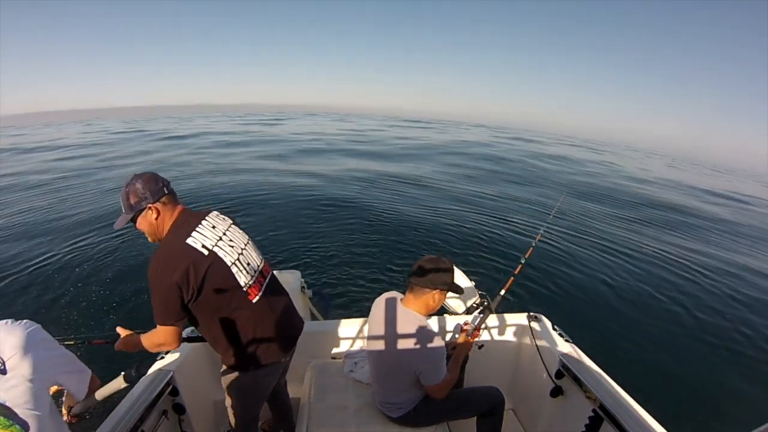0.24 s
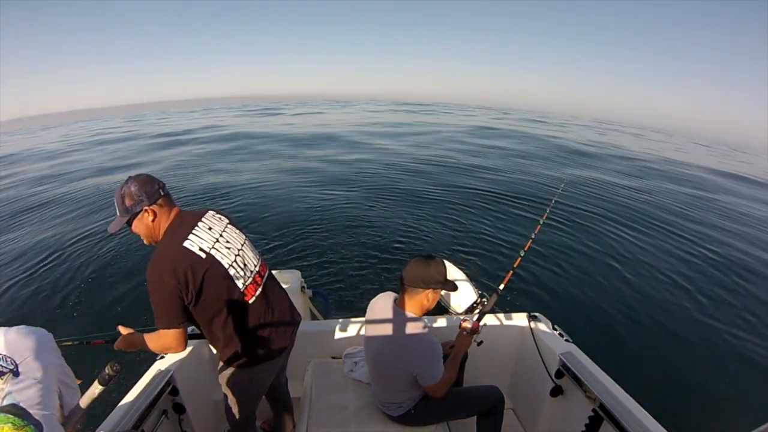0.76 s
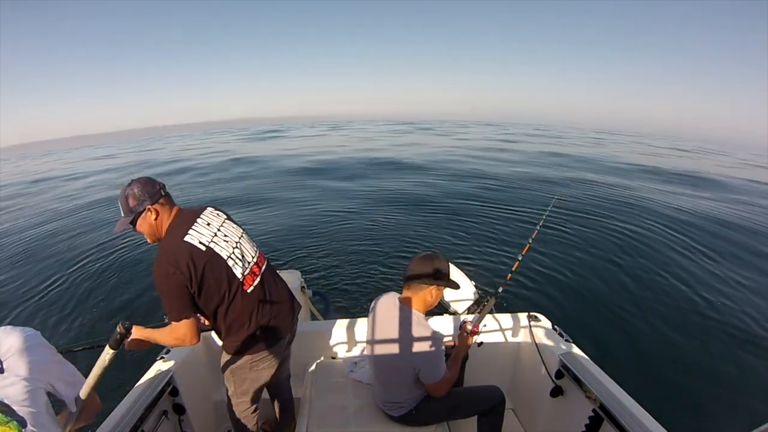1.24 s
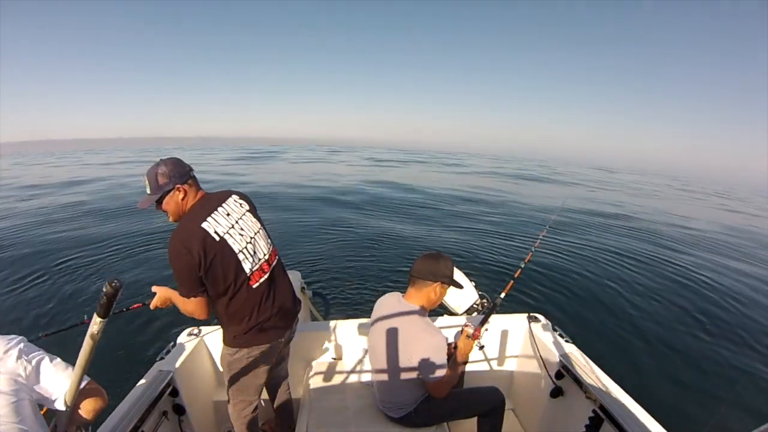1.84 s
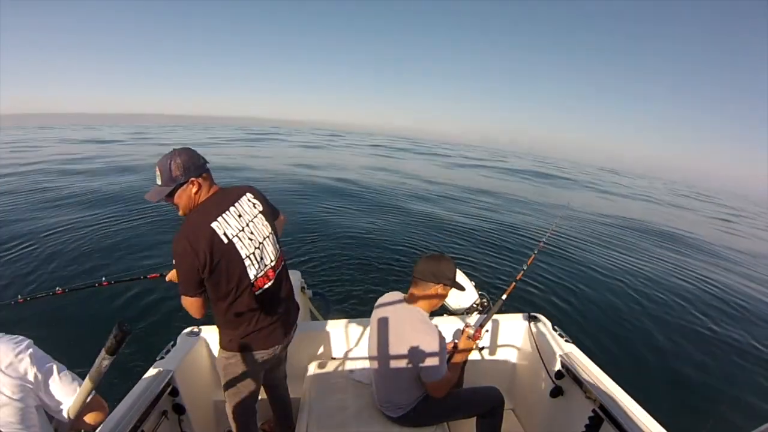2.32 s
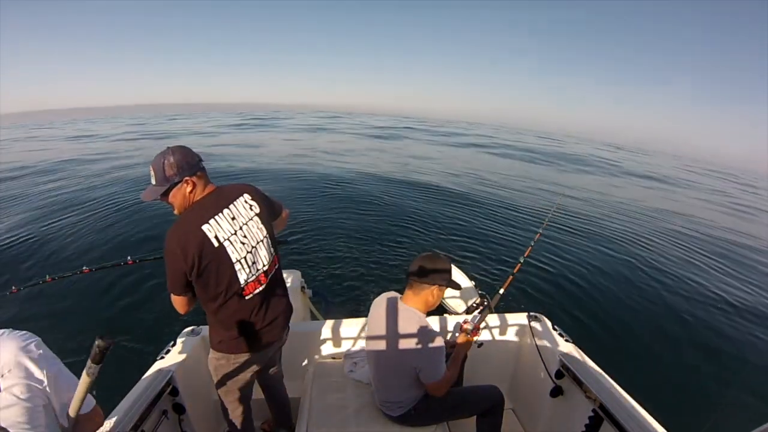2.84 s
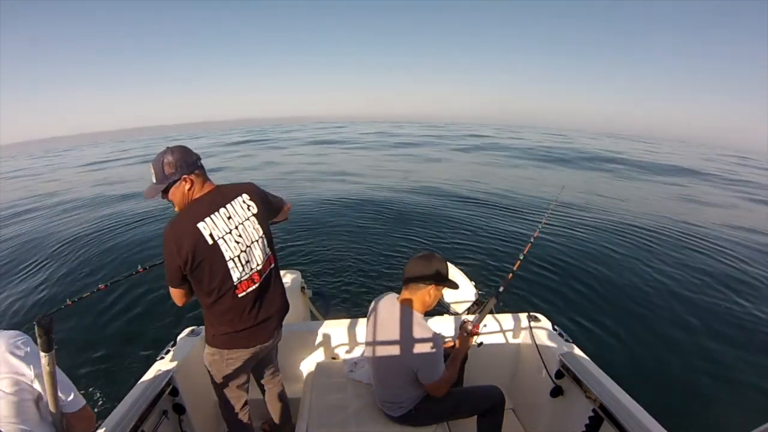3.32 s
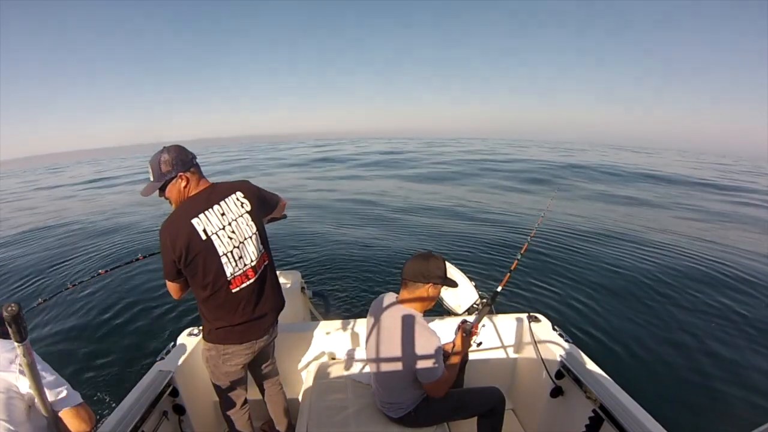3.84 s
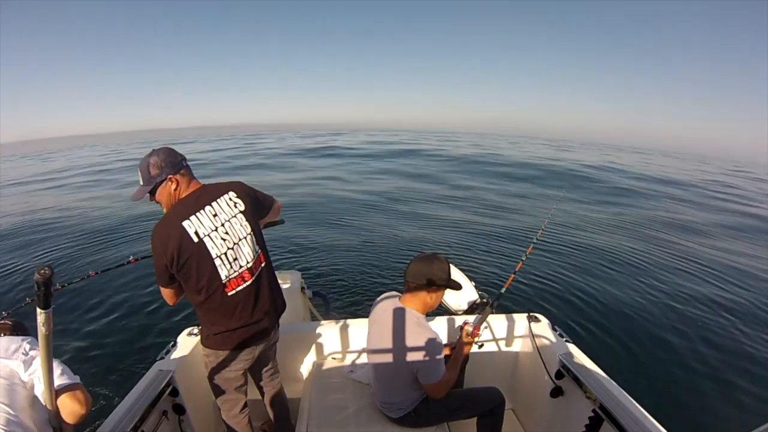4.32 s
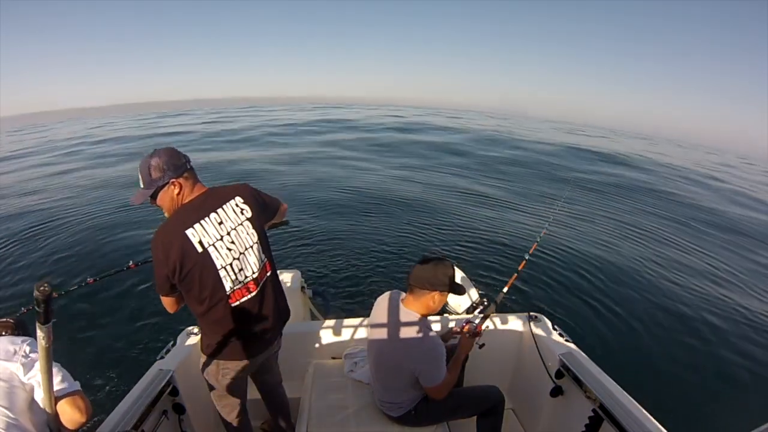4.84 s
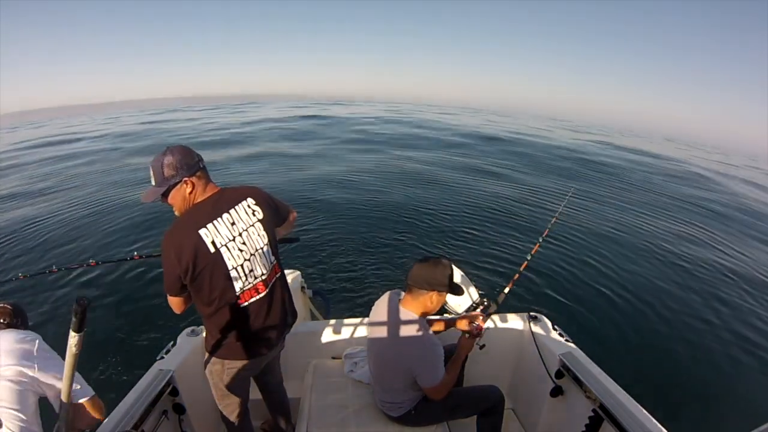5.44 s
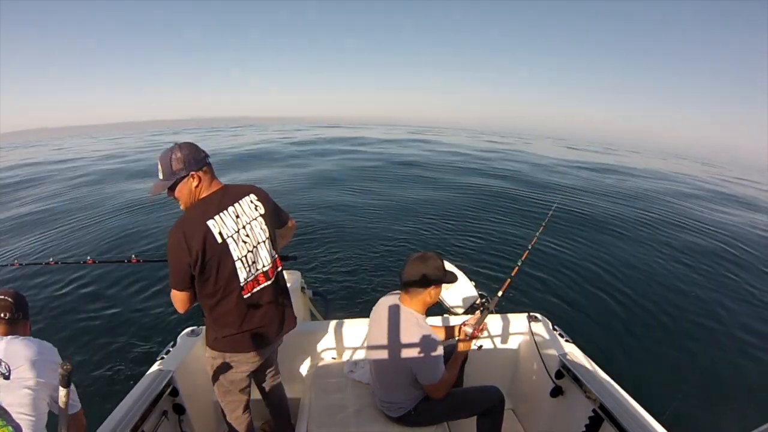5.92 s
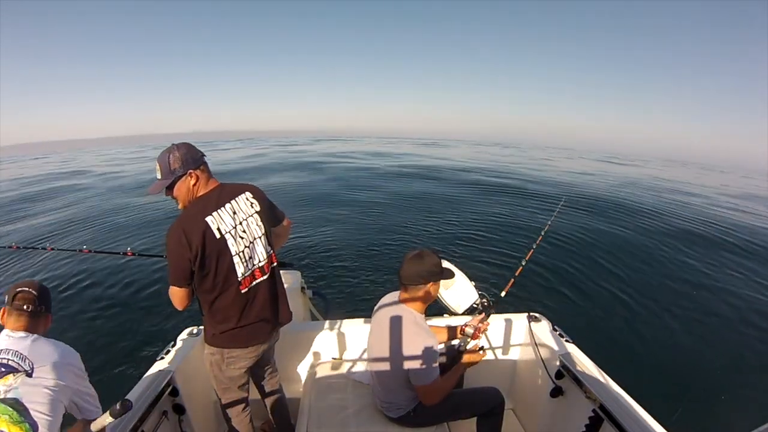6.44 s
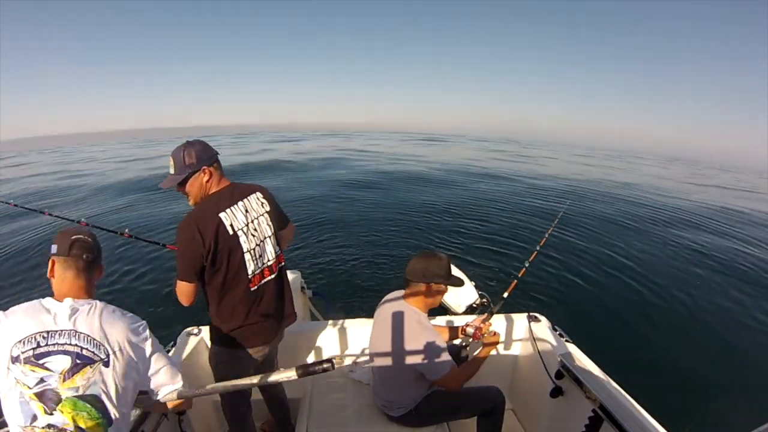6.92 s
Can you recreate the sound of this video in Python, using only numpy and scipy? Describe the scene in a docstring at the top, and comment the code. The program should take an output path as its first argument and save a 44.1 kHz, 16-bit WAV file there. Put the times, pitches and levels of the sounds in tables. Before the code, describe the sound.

Low throbbing boat engine idle on calm water, with early hull slaps and a brief line rasp, buzzing panel rattles, sharp clicks and a final knock.

```python
"""In the cockpit of a small fishing boat on a calm sea, an outboard idles a few metres away, its speed hunting.
At once wavelets slap and gulp at the hull, gear rustles and tackle clicks; at half a second line rasps off a reel.
A loose panel rattles in bouts, fullest near 2.8 and 5.1 s; a deep gulp comes at 3.5 s, a low burble swell at 3.8 s.
More clicks follow from 5.5 s and a rod butt knocks on the hull at 7.1 s; the cooling jet hisses throughout.
Firing pulses and sines make the engine, filtered noise the hiss and rubbing, damped modes the struck parts."""
import sys
import numpy as np
from scipy import signal
from scipy.fft import rfft, irfft
from scipy.io import wavfile
from scipy.ndimage import uniform_filter1d

SR = 44100
rng = np.random.default_rng(int(sys.argv[2]) if len(sys.argv) > 2 else 0)


def master_out(mix):
    """Clip the mix to full scale and print it as 16-bit PCM to the path in sys.argv[1]."""
    frames = np.transpose(np.atleast_2d(mix))
    ceiling = np.clip(frames, -1, 1)
    pcm = np.round(ceiling * 32767).astype(np.int16)
    wavfile.write(sys.argv[1], SR, pcm)


N = 316197
TIME = np.arange(N) / SR


def undb(db):
    """Decibels to gain."""
    return 10 ** (np.asarray(db) / 20)


def unit(x):
    """Scale to rms 1."""
    return x / np.sqrt(np.mean(x ** 2))


def crest(x):
    """Scale to peak 1."""
    return x / np.max(np.abs(x))


def curve(rows):
    """Each column of a table as a line through time."""
    s, *columns = np.transpose(rows)
    return [np.interp(TIME, s, column) for column in columns]


def walk(rate):
    """Smooth chance with spread 1, changing about rate times a second."""
    k = max(int(SR / rate), 1)
    steps = rng.standard_normal(size=1024).take(np.arange(N) // k, mode="wrap")
    return unit(uniform_filter1d(uniform_filter1d(steps, k), k))


def colour(x, points, size=8192):
    """Causal minimum-phase filter whose spectrum follows (Hz, dB) points."""
    hz, db = np.transpose(points)
    bin_hz = np.arange(size // 2 + 1) * SR / size
    gain = undb(np.interp(np.log(bin_hz + 1), np.log(hz), db))
    # folding the cepstrum forward in time makes the filter causal
    cepstrum = irfft(np.log(gain))
    cepstrum[1:size // 2] *= 2
    cepstrum[size // 2 + 1:] = 0
    impulse = irfft(np.exp(rfft(cepstrum)))
    return signal.fftconvolve(x, impulse)[:len(x)]


def fade(t60, size=12000):
    """A free decay that falls 60 dB in t60 seconds."""
    return np.exp(-np.log(1000) * TIME[:size] / t60)


def ring(modes, size=12000):
    """Damped modes start from rest after one blow; neighbours swing in opposite directions."""
    out = 0
    for k, (hz, db, t60) in enumerate(modes):
        swing = np.sin(2 * np.pi * hz * TIME[:size])
        out = out + (-1) ** k * undb(db) * fade(t60) * swing
    return out


def burst(t60, tail_t60, tail_db, size=12000):
    """A crack of noise and its weaker, longer scatter around the cockpit."""
    return rng.standard_normal(size) * (fade(t60) + undb(tail_db) * fade(tail_t60))


def add(out, s, x):
    """Mix x in at s seconds."""
    i = int(s * SR)
    out[i:i + len(x)] += x[:max(N - i, 0)]


def firings(turns, scatter_db, jitter_s):
    """One pulse per firing, each with its own size and delay."""
    at = np.flatnonzero(np.diff(np.floor(turns)))
    chance = rng.standard_normal((512, 2))[:len(at)]
    delay = (jitter_s * SR * chance[:, 1]).astype(int)
    pulses = np.zeros(N)
    pulses[np.clip(at + delay, 0, N - 1)] = undb(scatter_db * chance[:, 0])
    return pulses


def cycle_noise(turns, size=1920):
    """Noise that comes round again every two firings, as the same parts meet in the same order."""
    return np.interp(turns / 2 * size, np.arange(size), rng.standard_normal(size), period=size)


# exhaust drone, before the first overtone row's own level: time_s, level_db
DRONE_LEVEL = [(0.0, -31), (0.1, -36), (0.17, -30), (.26, -28.5), (0.31, -24.5), (.45, -25), (0.8, -21.5),
               (1.1, -23), (1.6, -26), (1.69, -40), (1.78, -22.5), (1.87, -35), (1.945, -29), (2.1, -24),
               (2.17, -30.5), (2.25, -24.5), (2.34, -30), (2.42, -24.5), (2.68, -24), (2.9, -30),
               (2.98, -20), (3.12, -27), (3.3, -24), (3.65, -22.5), (3.92, -26), (4.15, -32), (4.22, -31.5),
               (4.32, -29), (4.42, -25.5), (4.9, -29), (5.12, -33), (5.32, -24), (5.62, -23), (6.3, -25.5),
               (6.44, -26), (6.52, -34.5), (6.58, -25.5), (6.66, -35), (6.76, -26), (6.94, -26.5),
               (7.01, -21), (7.17, -24)]
# the drone and its overtones: multiple of the firing rate, level_db, roughness (0-1)
OVERTONES = [(1, -0.5, 0.05), (1.5, -22.5, 0.85), (2, -18.5, 0.05), (3.5, -24, 0.36), (4, -29, 0.06),
             (5.5, -29.5, 0.64), (10.5, -33, 0.32), (14.5, -35.5, 0.72), (16.5, -29.5, 0.45),
             (18.4, -30.5, 0.56)]
# resonances of the exhaust housing, which lift overtones that come near: pitch_hz, width_hz, lift_db
HOUSING = [(88.9, 7.9, 6), (177.9, 7.9, 7)]
# swell and sinking of the hum from overtones 3.5 and 4: time_s, lift_db
HUM_LIFT = [(0, -4.5), (.9, 1.5), (1.7, 3), (2.3, -1.5), (2.85, 3.5), (3.6, 2), (4.4, -5.5), (5.1, 0.5),
            (5.8, 4), (6.3, -1.5), (7.17, -2.5)]
THROB_DB, THROB_HZ = -43, 6.7  # uneven combustion: size, counted like the drone level, and mean rate
OVERTONE_DB = -27.5  # the level that the overtones above the first are counted from
ROUGH_HZ = 35.97  # how fast a rough overtone flutters


def drone(turns, firing_hz):
    """The muffled exhaust: nearly a sine at the firing rate, with overtones that resonate or break up roughly."""
    level_db, = curve(DRONE_LEVEL)
    throb = np.sin(2 * np.pi * np.cumsum(THROB_HZ * (1 + 0.15 * walk(rate=7))) / SR)
    fundamental = undb(level_db) + undb(THROB_DB) * throb
    hum_db, = curve(HUM_LIFT)
    out = 0
    for k, db, rough in OVERTONES:
        sway = 0.05 * (k > 1) * walk(rate=8)  # phase drift in turns
        scatter = walk(rate=ROUGH_HZ) + 1j * walk(rate=ROUGH_HZ)
        flutter = np.sqrt(1 - rough) + np.sqrt(rough / 2) * scatter
        lift_db = 0
        for hz, width, peak_db in HOUSING:
            lift_db = lift_db + peak_db / (1 + (2 * (k * firing_hz - hz) / width) ** 2)
        overtone = undb(OVERTONE_DB + lift_db + hum_db * (3 < k < 5) + walk(rate=6.5))
        size = fundamental if k == 1 else overtone
        wave = np.imag(flutter * np.exp(2j * np.pi * (k * turns + sway)))
        out = out + undb(db) * size * np.sqrt(2) * wave
    return out


# how hard the exhaust churns the water: time_s, level_db
CHURN_LEVEL = [(0, -37.5), (.4, -37.5), (.8, -35), (1.3, -35.5), (2.4, -38.5), (2.8, -34.5), (3.4, -38),
               (3.85, -35.5), (4.5, -40), (5.2, -34.5), (5.5, -37.5), (6.1, -36.5), (7.17, -36)]
# colour of the churned water: pitch_hz, level_db
BURBLE_COLOUR = [(8, -28), (18, -6.5), (30, -2), (42, -2.5), (55, -2), (64, 4.5), (72, 1), (82, 0),
                 (102, 0), (125, -6.5), (160, -9.5), (178, -6), (198, -15), (255, -12), (330, -16.5),
                 (400, -23.5), (600, -58.5)]


def burble(turns):
    """Uneven puffs of exhaust churn the water behind the transom."""
    level_db, = curve(CHURN_LEVEL)
    puffs = unit(firings(turns, scatter_db=4, jitter_s=0.0021))
    gas = colour(undb(-10.5) * puffs + rng.standard_normal(N), BURBLE_COLOUR)
    return unit(gas) * undb(level_db)


# colour of the noise under the cowling: pitch_hz, level_db
MACHINERY_COLOUR = [(200, -14), (330, -6), (480, 2), (630, -0.5), (785, -1.5), (825, 4), (880, -3.5),
                    (920, -3.5), (1030, -2.5), (1230, -11.5), (1500, -15.5), (1900, -23), (2400, -25.5),
                    (3000, -36.5), (5000, -51.5)]
MACHINERY_DB = -47.5  # mean level of the idle
CLATTER_DB = -11.5  # noise that repeats with every engine cycle, against the steady noise
NOTCH_SHARE = 0.7  # how much of one narrow band a reflection cancels


def machinery(turns):
    """Valve gear and intake under the cowling pulse with each firing; a reflection thins one narrow band."""
    pulse = 1 + 0.037 * np.cos(2 * np.pi * turns)
    clatter_gain = undb(CLATTER_DB + 2 * walk(rate=4.22))
    clatter = clatter_gain * cycle_noise(turns + 0.011 * walk(rate=6))
    wash = colour(pulse * (rng.standard_normal(N) + clatter), MACHINERY_COLOUR)
    notched = signal.lfilter(*signal.iirnotch(548, 9, SR), wash)
    wash = wash + NOTCH_SHARE * (notched - wash)
    return unit(wash) * undb(MACHINERY_DB + 0.5 * walk(rate=14))


# bouts of rattling: loudest_s, swell_s, dying_s, level_db (of the ring, without the dry crack)
RATTLE_BOUTS = [(.12, 0.13, 0.11, -52.5), (2.8, 0.21, 0.24, -47.5), (3.87, 0.21, 0.067, -52),
                (5.12, 0.21, 0.45, -47.5), (6.7, 0.17, 0.39, -63)]
# the panel's hardest strikes: start_s, peak_db (of the ring)
PANEL_STRIKES = [(2.586, -33.5), (2.696, -32.5), (2.74, -31), (2.763, -31.5), (2.832, -28.5), (2.854, -32),
                 (2.876, -29), (3.875, -43), (4.038, -39), (4.908, -39), (4.952, -35), (5.021, -33.5),
                 (5.088, -33), (5.156, -33), (5.203, -31.5), (5.224, -34.5), (5.27, -31.5), (5.292, -33.5),
                 (5.313, -33), (5.423, -42), (6.307, -37)]
# modes of the loose panel: pitch_hz, level_db, t60_s
PANEL_MODES = [(699, 3, 0.012), (885, 2, 0.0077), (1023, 1.5, 0.012), (2287, -12.5, 0.011)]
# colour of the panel's dry crack: pitch_hz, level_db
PANEL_CRACK_COLOUR = [(300, -15), (700, -9), (1050, -3), (1500, -10.5), (2350, -8.5), (3000, -14.5),
                      (4100, -13), (5300, -25), (9000, -31), (15000, -52)]
TAP_REST_DB = -66.5  # between bouts the panel barely ticks
CHATTER_S, CHATTER_DB = 0.007, 1  # each tap breaks into chatter: decay time, level against the clean tap
CRACK_DB, STRIKE_CRACK_DB = -13.5, -17  # dry crack against the ring, in light taps and hard strikes


def rattle(turns):
    """A loose panel taps once per firing in bouts; now and then a hard strike takes a tap's place."""
    force = undb(TAP_REST_DB)
    for s, swell_s, dying_s, db in RATTLE_BOUTS:
        width_s = np.where(TIME < s, swell_s, dying_s)
        force = force + undb(db) * np.exp(-((TIME - s) / width_s) ** 2)
    modes = ring(PANEL_MODES)
    age = TIME[:len(modes)]
    tap = crest(modes * age)  # a soft contact lets the ring swell in
    # keep the light taps in step with the hard ones, and leave out those that a hard one replaces
    strike_s = np.transpose(PANEL_STRIKES)[0]
    lag = np.unwrap(np.interp(strike_s, TIME, turns) % 1, period=1)
    beat = turns - np.interp(TIME, strike_s, lag)
    light = ~np.isin(np.round(beat), np.round(np.interp(strike_s, TIME, beat)))
    taps = light * firings(beat, scatter_db=2, jitter_s=0.0005)
    chatter = signal.fftconvolve(taps, np.exp(-age / CHATTER_S))[:N] * rng.standard_normal(N)
    contact = unit(taps) + undb(CHATTER_DB) * unit(chatter)
    ringing = unit(signal.fftconvolve(contact, tap)[:N])
    cracking = unit(colour(chatter, PANEL_CRACK_COLOUR))
    out = force * (ringing + undb(CRACK_DB) * cracking)
    for s, db in PANEL_STRIKES:
        noise = burst(t60=0.016, tail_t60=0.089, tail_db=-26)
        crack = crest(colour(noise, PANEL_CRACK_COLOUR))
        add(out, s, undb(db) * (tap + undb(STRIKE_CRACK_DB) * crack))
    return out


# clicks of the tackle, and at 2.885 s a bright tick of the rattling panel:
# start_s, peak_db, pitch_hz of the struck part, part_db of that note against the dry snap
CLICKS = [(0.163, -38, 8400, -19), (0.1709, -24.5, 2400, -16), (0.1748, -35, 6940, -7),
          (0.333, -46, 7150, -20), (0.429, -39.5, 7150, -15), (0.715, -47, 4060, 2),
          (.9952, -44, 8400, -10), (2.885, -49, 4120, 4), (5.529, -30.5, 7880, -8), (5.534, -29, 2400, -9),
          (5.5509, -19, 8500, -12), (5.5536, -23, 6090, 6), (5.5576, -24.5, 2400, -9),
          (5.739, -44.5, 6000, -2), (6.695, -32.5, 3130, 0), (6.6966, -28, 8400, -6),
          (6.701, -36.5, 2500, 4), (6.706, -37, 3180, -5), (6.8931, -45, 8400, -15),
          (6.961, -45, 8390, -15), (7.032, -47, 8390, -14)]
# colour of a click's dry snap: pitch_hz, level_db
SNAP_COLOUR = [(500, -3), (1700, -4.5), (2450, -4), (3300, -3), (4200, 0), (5400, -6), (6200, -4),
               (7200, 0), (8400, -0.5), (9300, -1.5), (10200, -9), (11700, -9), (13000, -9), (15500, -45)]
# modes of the reel's frame, which ring in every click: pitch_hz, level_db, t60_s
REEL_MODES = [(2400, -1.5, 0.035), (3020, -1, 0.033), (3550, -3, 0.04), (4130, -15, 0.04),
              (6020, -3, 0.035), (6200, -15, 0.03), (7130, 0, 0.023), (7850, 2, 0.031), (8400, -16, 0.024),
              (9140, -4, .025), (11140, 0.5, 0.019), (11770, -8, 0.05), (12250, -8, .025)]
# a rod butt knocks on the hull and rebounds: start_s, crack_peak_db, ring_peak_db
KNOCKS = [(7.1309, -27, -27.5), (7.139, -39, -28)]
# colour of the knock's crack: pitch_hz, level_db
HULL_COLOUR = [(150, -19), (350, -2), (900, 0.5), (1400, -1), (2300, -4), (2900, -8), (4000, -5),
               (5300, -15), (6800, -11.5), (8500, -19), (10000, -26), (15000, -45)]
# modes of the knocked hull: pitch_hz, level_db, t60_s
HULL_MODES = [(330.7, 3.5, 0.23), (665, 7, .2), (945, 1, 0.14), (1065, -1, .15), (1250, -10, .13),
              (1400, 0, .08), (1810, -3, 0.031), (2327, -2, 0.04), (3340, -12, .035), (3890, -2, .04),
              (6600, -10, .03)]


def clicks_and_knocks():
    """A click is a dry snap, a metallic ring and the struck part's note; a rod butt rings the hull."""
    out = np.zeros(N)
    frame = undb(-3.5) * crest(ring(REEL_MODES))
    for s, db, part_hz, part_db in CLICKS:
        snap = crest(colour(burst(t60=0.012, tail_t60=0.099, tail_db=-13.5), SNAP_COLOUR))
        part = ring([(part_hz, part_db, 0.03)])
        add(out, s, undb(db) * crest(snap + frame + part))
    for s, crack_db, ring_db in KNOCKS:
        crack = crest(colour(burst(t60=0.08, tail_t60=0.14, tail_db=-12), HULL_COLOUR))
        add(out, s, undb(crack_db) * crack)
        add(out, s, undb(ring_db) * crest(ring(HULL_MODES)))
    return out


# colour of the line's scrape: pitch_hz, level_db
RASP_COLOUR = [(700, -15), (1300, -18), (1800, 0), (3100, -5), (3800, 5.5), (4550, 2), (5200, -14),
               (6000, -3.5), (8500, -7.5), (10000, -19), (12000, -16), (15000, -36)]
RASP_S, RASP_ATTACK_S, RASP_HOLD_S, RASP_RELEASE_S = 0.535, 0.037, 0.0085, 0.0287
RASP_DB, RASP_RING_DB = -39.5, -2  # mean scrape level at full pull; the whine against the scrape
RASP_CATCHES_PER_S, RASP_HISS_DB = 700, 9  # density of catches; the smooth hiss against them
# the spool's whine rises with the speed of the line: lowest pitch, rise at full pull, rate of its flutter
RASP_PITCH_HZ, RASP_RISE_HZ, RASP_WIDTH_HZ = 3680, 1000, 560


def rasp():
    """Line slips off a reel in a quick, uneven run of tiny catches; the spool whines up and down with the pull."""
    corners_s = np.cumsum([RASP_S, RASP_ATTACK_S, RASP_HOLD_S, RASP_RELEASE_S])
    pull = np.interp(TIME, corners_s, [0, 1, 1, 0])
    catches = (rng.random(N) < RASP_CATCHES_PER_S / SR) * rng.choice([-1, 1], N)
    friction = unit(catches) + undb(RASP_HISS_DB) * rng.standard_normal(N)
    scrape = unit(colour(friction, RASP_COLOUR))
    phase = 2 * np.pi * np.cumsum(RASP_PITCH_HZ + RASP_RISE_HZ * pull) / SR
    whine = walk(rate=RASP_WIDTH_HZ) * np.sin(phase) + walk(rate=RASP_WIDTH_HZ) * np.cos(phase)
    level = undb(RASP_DB + 1.6 * walk(rate=220))
    return (scrape + undb(RASP_RING_DB) * whine) * pull * level


# colour of the rubbing gear: pitch_hz, level_db
RUSTLE_COLOUR = [(250, -5), (450, -1.5), (800, 9), (1400, -8), (2500, -11), (4200, -11.5), (5200, -16),
                 (6200, -13), (9500, -21), (12000, -21), (15000, -30)]
RUSTLE_DB, RUSTLE_HOLD_S, RUSTLE_RELEASE_S = -50, 0.7, 0.31  # mean level while held; decay time constant


def rustle():
    """An angler's clothes and gear rub in uneven, gritty strokes, then settle."""
    grit = (rng.random(N) < 900 / SR) * rng.standard_normal(N)
    rubbing = rng.standard_normal(N) + undb(-2.0) * unit(grit)
    sound = unit(colour(rubbing, RUSTLE_COLOUR))
    envelope = np.exp(-np.maximum(TIME - RUSTLE_HOLD_S, 0) / RUSTLE_RELEASE_S)
    return sound * envelope * undb(RUSTLE_DB + 2.9 * walk(rate=35.3))


# wavelets slapping dully against the hull, and at 3.811 s a low swell of the exhaust burble:
# start_s, t60_s, peak_db, pitch_hz of the band's middle
SLAPS = [(0.057, 0.05, -30, 260), (0.057, .05, -39, 856), (.083, .05, -31, 520), (.11, 0.055, -31, 450),
         (.112, 0.13, -35, 810), (.165, 0.046, -31, 860), (0.425, 0.063, -36, 328),
         (.425, 0.17, -30.5, 610), (0.427, 0.28, -41, 990), (.608, .09, -35, 480), (.652, .16, -39, 383),
         (0.741, 0.28, -31.5, 480), (0.819, .16, -41, 332), (3.811, 0.29, -32, 170.2)]
SLAP_SPREAD = 1.47  # the band reaches this factor below and above its middle


def slaps():
    """Each slap, and the one burble swell, is a decaying burst of noise in one broad band."""
    out = np.zeros(N)
    for s, t60, db, hz in SLAPS:
        edges_hz = hz * np.array([1 / SLAP_SPREAD, SLAP_SPREAD])
        band = signal.butter(2, edges_hz, "band", fs=SR, output="sos")
        thud = signal.sosfilt(band, burst(t60=t60, tail_t60=0.23, tail_db=-39))
        add(out, s, undb(db) * crest(thud))
    return out


# wavelets gulping under the hull: start_s, t60_s, peak_db, pitch_hz at the start
GULPS = [(0.055, 0.022, -29.5, 204), (0.063, 0.045, -34, 417), (.08, 0.029, -29.5, 378),
         (.426, 0.04, -34, 605), (0.752, 0.067, -39, 377), (.765, 0.057, -39, 495), (.955, .05, -38, 557),
         (1.33, .25, -35.5, 154), (2.585, 0.12, -32.5, 240), (3.46, .25, -24, 95.4),
         (6.125, 0.18, -35, 253.5)]
GULP_RISE, GULP_ATTACK_S = 0.4, 0.0019  # share the pitch rises in each t60, for two of them; swell time


def gulps():
    """A wavelet traps a pocket of air under the hull, which rings and rises in pitch as it shrinks."""
    out = np.zeros(N)
    for s, t60, db, hz in GULPS:
        decay = fade(t60)
        age = TIME[:len(decay)]
        cycles = np.cumsum(hz * (1 + GULP_RISE * np.minimum(age / t60, 2))) / SR
        swell = (1 - np.exp(-age / GULP_ATTACK_S)) ** 2
        add(out, s, undb(db) * crest(swell * decay * np.sin(2 * np.pi * cycles)))
    return out


# colour of the falling spray: pitch_hz, level_db
JET_COLOUR = [(1200, -13), (2000, 0.5), (2600, 7), (3100, -1.5), (4050, 2.5), (4800, -6), (5350, -9.5),
              (5850, 2), (6400, -0.5), (8300, -4), (9800, -10), (11900, -10), (13000, -14.5), (15500, -30)]
JET_DB = -61.5  # mean level


def jet():
    """The cooling jet falls on the sea as a fine, dense spray of drops."""
    drops = (rng.random(N) < 3000 / SR) * rng.standard_normal(N)
    spray = colour(rng.standard_normal(N) + undb(-4.0) * unit(drops), JET_COLOUR)
    return unit(spray) * undb(JET_DB + 0.85 * walk(rate=14))


# hunting engine speed: time_s, firing_hz (firings per second)
ENGINE_SPEED = [(0, 45.54), (.5, 46.5), (.85, 46.9), (1.28, 45.4), (1.5, 45.74), (1.7, 43.82),
                (2.05, 47.52), (2.4, 46.05), (2.8, 44.27), (3.0, 45.66), (3.15, 45.52), (3.3, 46.9),
                (3.6, 47.34), (4.05, 45.3), (4.32, 47.6), (4.7, 45.9), (5.0, 44.05), (5.4, 44.8),
                (5.85, 46.93), (6.15, 47.33), (6.65, 44.87), (6.9, 46.98), (7.17, 46.13)]


def scene():
    """One crankshaft times the engine's drone, burble, machinery and rattle; gear and water sound around it."""
    firing_hz, = curve(ENGINE_SPEED)
    turns = np.cumsum(firing_hz) / SR  # one turn is one firing
    engine = drone(turns, firing_hz) + burble(turns) + machinery(turns) + rattle(turns)
    gear = clicks_and_knocks() + rasp() + rustle()
    water = slaps() + gulps() + jet()
    return (engine + gear + water)[None]


TOP_HZ = 15000


def record(dry):
    """One microphone channel: a steep low-pass cuts the top."""
    return signal.sosfilt(signal.ellip(8, 0.2, 70, TOP_HZ, fs=SR, output="sos"), dry)


dry = scene()
out = record(dry)
master_out(out)
```